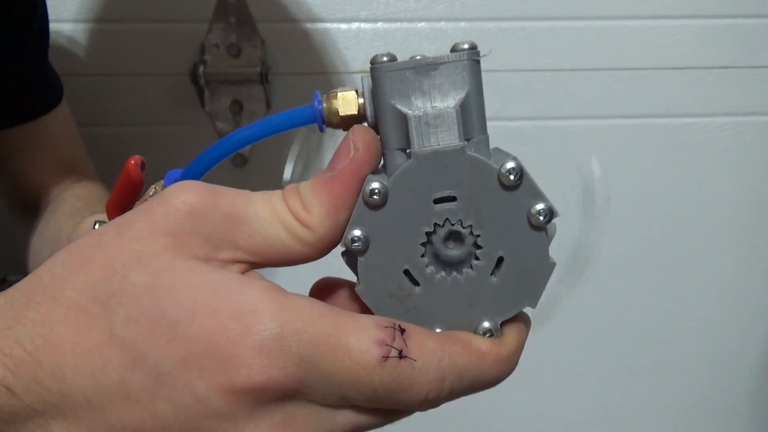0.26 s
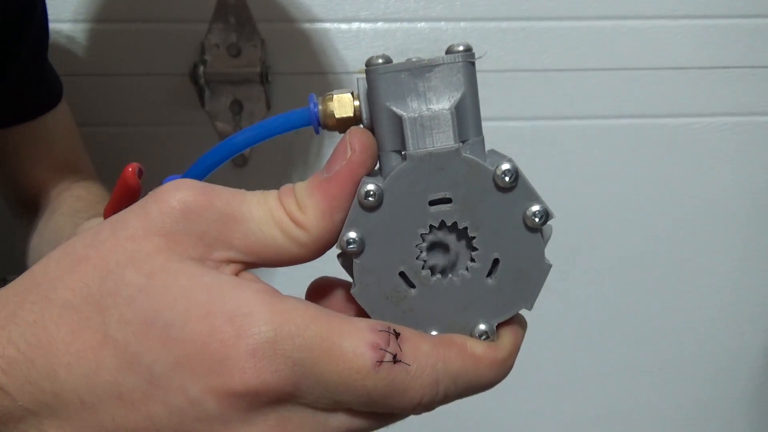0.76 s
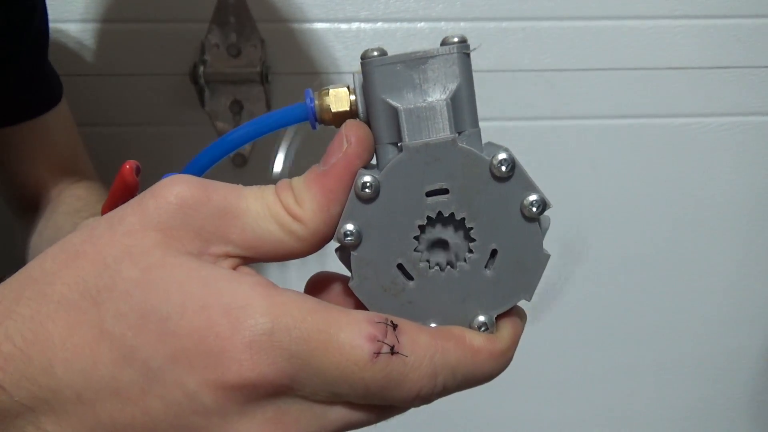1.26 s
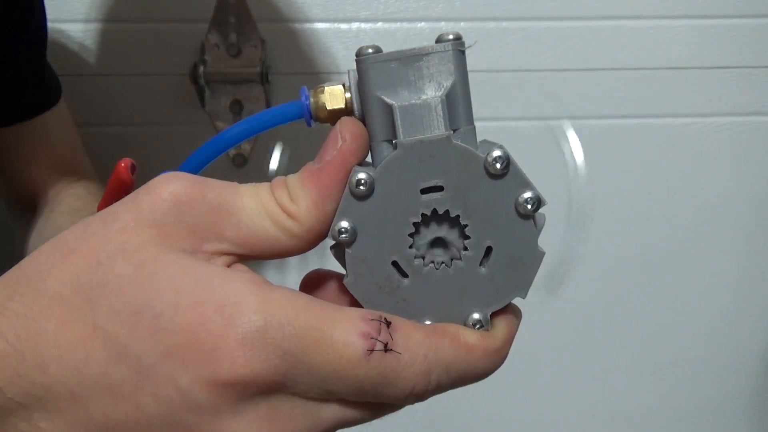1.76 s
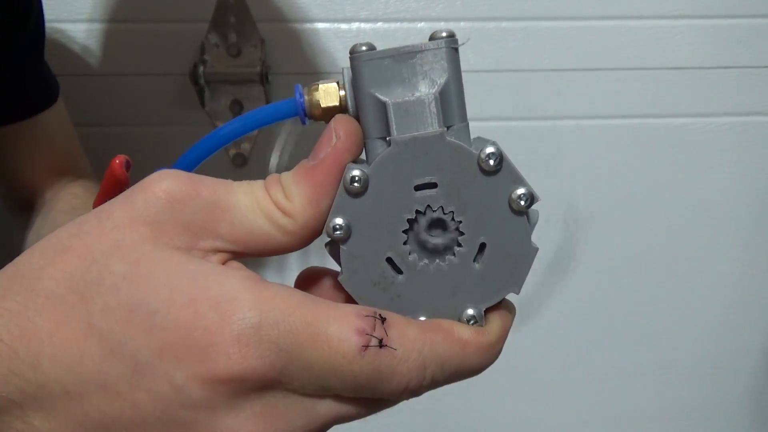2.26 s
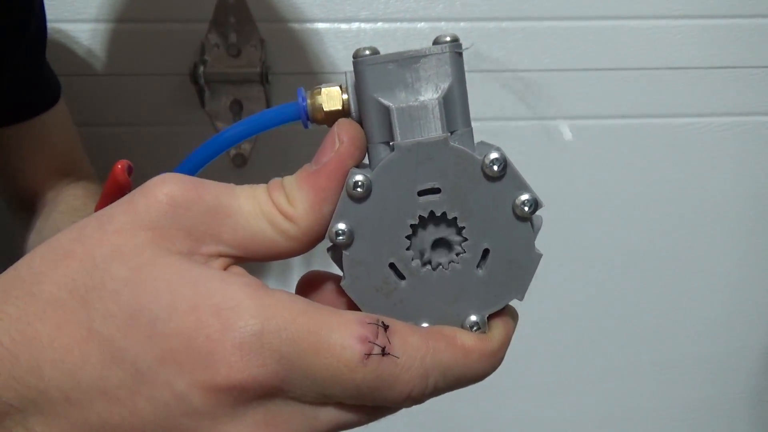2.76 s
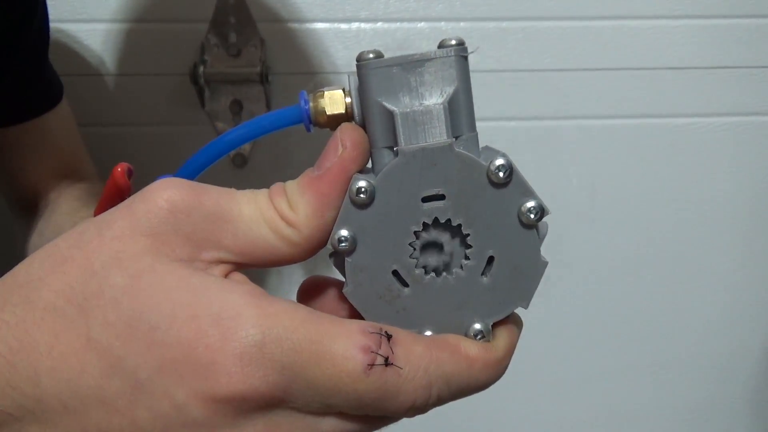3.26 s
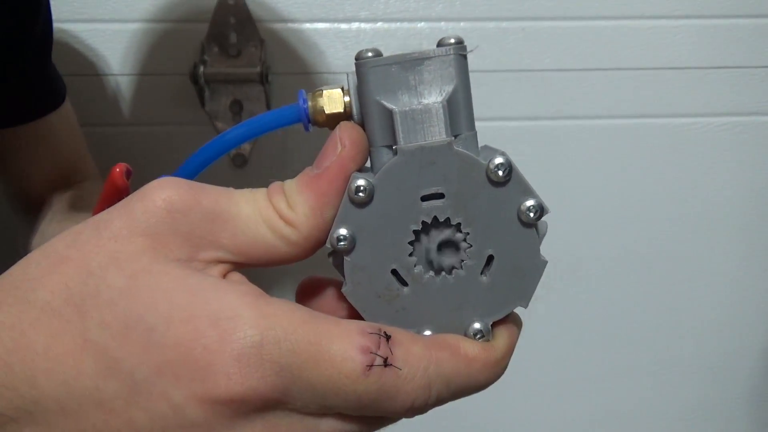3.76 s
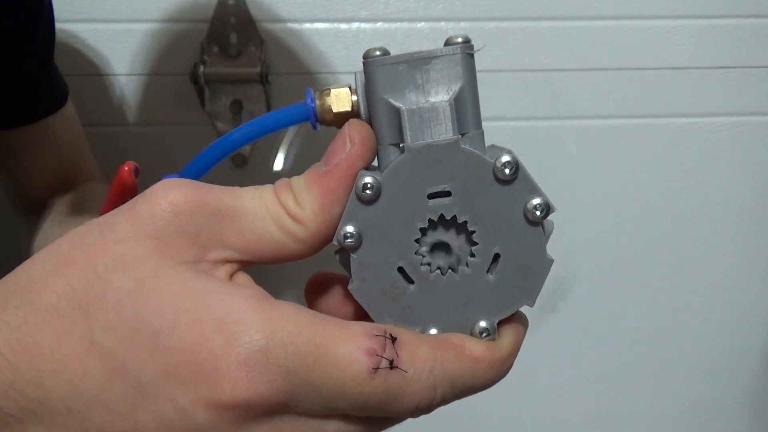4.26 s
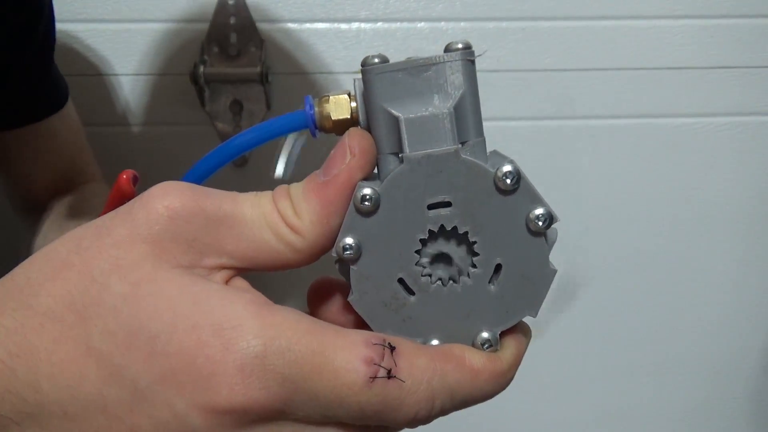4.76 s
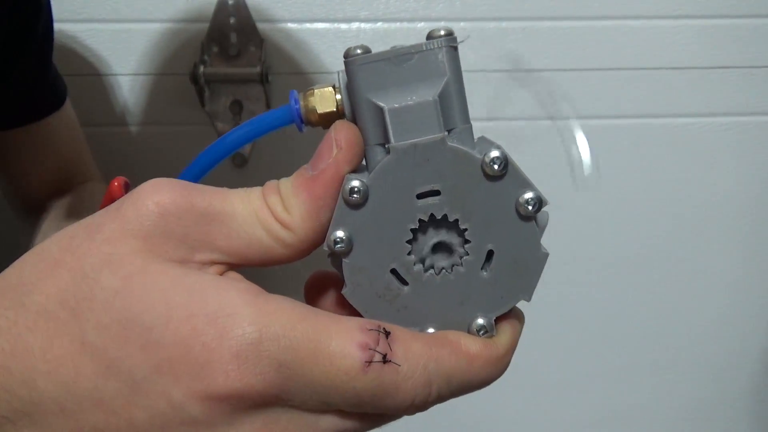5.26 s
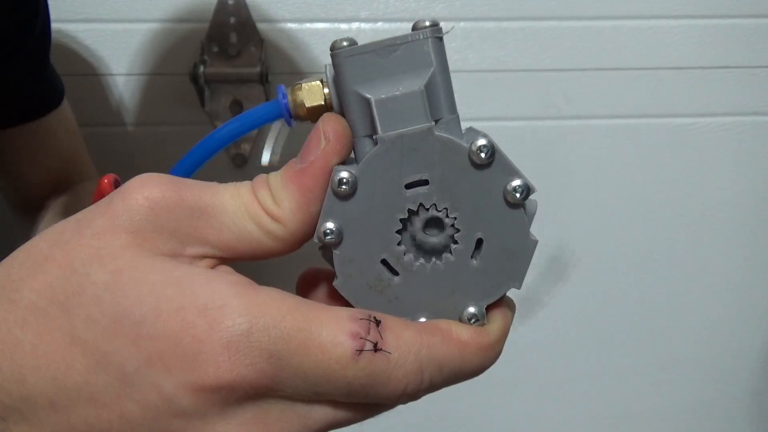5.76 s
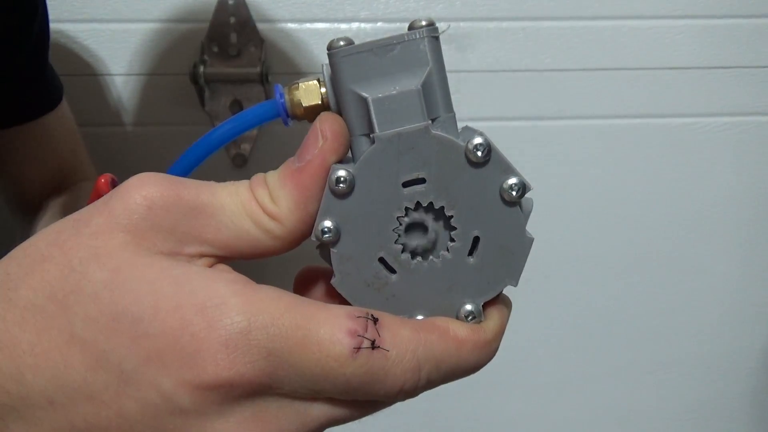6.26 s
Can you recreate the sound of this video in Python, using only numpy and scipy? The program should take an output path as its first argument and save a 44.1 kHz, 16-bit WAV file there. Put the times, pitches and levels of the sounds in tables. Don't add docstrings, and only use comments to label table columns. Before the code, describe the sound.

Very close to a stereo microphone pair in a garage, a small hand-held plastic engine runs on compressed air. Crisp jets of hiss, each edged by a small pop at opening and closing, repeat about nine times a second. Between them air leaks and swells. Every second jet brings a short gritty squeak; rotor tips knock, gears tick and ridges crackle. It speeds up slightly, then slows unevenly to about seven jets a second.

```python
import sys
import numpy as np
from scipy import signal
from scipy.fft import rfft, irfft, next_fast_len
from scipy.io import wavfile
from scipy.ndimage import uniform_filter1d, map_coordinates

SR = 44100
rng = np.random.default_rng(int(sys.argv[2]) if len(sys.argv) > 2 else 0)


def output_pcm(signal):
    pcm = np.clip(np.atleast_2d(signal).T, -1, 1) * 32767
    wavfile.write(sys.argv[1], SR, np.round(pcm).astype(np.int16))


def field_ratio(decibels):
    return 10 ** (np.asarray(decibels, dtype=float) / 20)


N = 287532
T = np.arange(N) / SR

# (time [s], speed [turns/s])
SHAFT_SPEED = [
    (0, 4.422),
    (.86, 4.849),
    (1.73, 4.888),
    (2.37, 4.384),
    (2.89, 4.212),
    (3.79, 4.628),
    (4.33, 4.131),
    (4.81, 3.894),
    (5.88, 3.611),
    (6.6, 3.836),
]
OPENS_TURN = [.063, .549]
SHUTS_TURN = [.289, .773]
# (time [s], pressure build-up behind the shut port [dB])
SEAL_LIFT = [(0, -27), (.45, -31.5), (.95, -29), (1.5, -31.5), (1.8, -23), (2.0, -25), (2.22, -18),
             (2.34, -27.5), (2.58, -22), (2.9, -27.5), (3.2, -36.5), (3.6, -34.5), (3.75, -26.5),
             (4.05, -22), (4.9, -24), (5.05, -28.5), (5.45, -26), (6.5, -29)]
# (first stroke [dB], second [dB])
JET_DB = [-17, -17]
FRESH_DB = [0.02, 0.86]
SPENT_DB = [0.2, -0.5]
BUILD_DB = [0.24, -0.4]
POP_OPEN_DB = [-21, -21.5]
POP_SHUT_DB = [-23.5, -23]
# (frequency [Hz], fresh jet [dB], spent jet [dB], leak [dB], build-up [dB])
AIR_COLOURS = [(464, -20.5, -27, -28.5, -20), (1040, -20.5, -21.5, -17.5, -19.5),
               (1916, -10.5, -12, -5, -14), (3520, -7.5, -6, 0, -5.5), (4700, -1.5, -8, -2, -7.5),
               (4850, -7, -8, -7.5, -3.5), (6590, 1.5, -5, -1, 4.5), (7370, -2, -12.5, -12, 1),
               (8130, 2.5, -6, -9.5, 6.5), (10190, -6.5, 1, 0, 6), (11120, -8.5, -7, -3, -7),
               (12300, -10, -10, -5.5, -9), (15100, -9, -17, -26, -2), (15800, -19, -24.5, -14, -6)]
# (frequency [Hz], width [Hz], level [dB])
RIDGE_MODES = [(1750, 1000, -5.5), (2750, 450, 5.5), (4400, 870, -9)]
# (frequency [Hz], width [Hz], level [dB])
SLOT_MODES = [(2670, 150, 0), (2900, 240, -7)]
# (shaft angle [turns], level [dB])
WHISTLE_SWELL = [(0, -34), (.06, -32), (.1, -26.5), (.13, -28), (.17, -38), (.46, -40), (.51, -32.5),
                 (.536, -29), (.565, -35), (.62, -41), (.88, -40), (1, -34)]
# (turn [count], level [dB], pitch [Hz])
SQUEAKS = [(0, -34, 614), (2, -33, 630), (3, -34.5, 654), (4, -34, 683), (5, -33, 600), (6, -32.5, 607),
           (7, -32, 658), (8, -35, 587), (9, -32.5, 617), (11, -33.5, 576), (12, -36, 613), (13, -32, 668),
           (14, -33.5, 623), (15, -34, 606), (16, -35, 580), (17, -33, 606), (18, -35, 633),
           (19, -35.5, 550), (20, -34, 625), (21, -36, 577), (22, -36, 620), (23, -34.5, 626),
           (24, -33, 620), (25, -33, 609), (26, -33.5, 637), (27, -33, 632)]
# (frequency [Hz], width [Hz], level [dB])
HOUSING_MODES = [(575, 310, 0), (865, 280, 2.5), (1520, 500, -25), (2660, 250, 1)]
# (shaft angle [turns], level [dB], ring [Hz], width [Hz])
KNOCKS = [
    (.228, 1, 2000, 700),
    (.24, -8.5, 750, 500),
    (0.359, -14, 1010, 500),
    (.68, -8, 550, 400),
]
# (time [s], level [dB], left-right [dB])
GUSTS = [(.29, -49, -1), (.915, -38, 7), (1.122, -37, 5), (1.325, -52, -18), (1.74, -41, 0),
         (2.164, -88, -5), (2.196, -29, 1), (2.612, -33.5, 1), (2.891, -41.5, 3), (3.77, -50, -4),
         (3.972, -36, 1), (4.499, -36, 1), (4.738, -34.5, 2), (4.953, -44, -1), (5.213, -39, 3)]
# (frequency [Hz], level [dB])
BUFFET_COLOUR = [(25, -27), (60, -9), (140, -3), (300, 2.5), (600, -24), (1200, -20)]
# (frequency [Hz], level [dB])
SWIRL_COLOUR = [(25, -44), (70, -30), (140, -10), (300, -6.5), (600, -7), (1200, -25)]
# (share of the pause [0-1], level [dB], slot ring re level [dB])
BACKLASH = [
    (.5, -31.5, -17),
    (.74, -24, -11),
]
# (time [s], level [dB], slot ring re level [dB])
TICKS = [(0.1121, -15.5, -11), (0.3335, -20, -6), (0.4268, -19, -12), (0.5323, -21, -17),
         (0.7453, -17, -21), (.952, -18.5, -14), (1.0725, -19, -17), (1.27, -24, -35), (1.3778, -20, -29),
         (1.4645, -23, -7), (1.568, -20.5, -22), (1.787, -19, -15), (1.868, -18, -18), (2.083, -22.5, -20),
         (2.417, -22, -4), (2.9094, -18, -7), (3.0002, -21, -17), (3.357, -15.5, -20), (3.371, -26, -3),
         (3.5765, -17.5, -22), (3.8115, -20, -5), (4.2435, -22, -8), (4.358, -20.5, -19),
         (4.7342, -19, -9.5), (4.993, -23, -7), (5.022, -28, -4), (5.401, -20, -15), (5.6345, -22, -5),
         (6.2028, -22, -5), (6.3666, -22, -9)]
# (frequency [Hz], level [dB])
CLACK_COLOUR = [(1200, -12), (2000, -6.5), (3800, 7), (5200, -3.5), (8000, -2.5), (11000, -11),
                (15500, -3.5)]
# (frequency [Hz], level [dB])
HUM_COLOUR = [(25, -25), (60, -17), (150, 1.5), (400, 1.5), (1000, -1), (3000, -15.5)]
# (frequency [Hz], level [dB])
SCATTER_COLOUR = [(200, -27), (600, -29), (1500, -16), (3200, -35), (5000, -25), (6500, -16.5), (9500, -23),
                  (11500, -19.5), (14000, -41)]
# (frequency [Hz], t60 [s])
GARAGE_T60 = [(200, 0.62), (2000, 0.9), (10000, 0.54)]
# (frequency [Hz], left-right [dB])
PAIR_LEAN = [(60, 0.0), (92, -4), (140, 3), (210, 2.5), (330, -1.5), (500, 0), (770, 1), (1170, -2.5),
             (1790, 2), (2740, 1), (4190, -0.5), (6410, 0), (9810, -2.5), (15000, 2)]
# (frequency [Hz], level [dB])
CAPSULE_COLOUR = [(8200, 0), (8700, -2), (9300, 0), (14700, 0), (15200, 4)]


def unit(x):
    return x / np.sqrt(np.mean(x ** 2) + 1e-20)


def along(points, hz):
    f, v = np.transpose(points)
    return np.interp(np.log(hz + 1), np.log(f + 1), v)


def filtered(x, response):
    m = next_fast_len(N + 8192)
    return irfft(rfft(x, m) * response(np.fft.rfftfreq(m, 1 / SR)), m)[..., :N]


def hiss(points, channels=1):
    noise = rng.standard_normal((channels, N))
    return unit(filtered(noise, lambda hz: field_ratio(along([(10, -90), *points], hz))))


def resonant(x, modes):
    def response(f):
        total = 0
        for k, (centre, width, db) in enumerate(modes):
            damping = 1j * f * width
            total = total + (-1) ** k * field_ratio(db) * damping / (centre * centre - f * f + damping)
        return total
    return filtered(x, response)


def wobble(rate):
    return map_coordinates(rng.standard_normal(int(N * rate / SR) + 4), [T * rate])


def staged(times, levels_db):
    return field_ratio(np.interp(T, np.sort(np.transpose(times).ravel()), np.transpose(levels_db).ravel()))


def add(track, s, sound):
    part = track[..., max(round(s * SR), 0):][..., :sound.shape[-1]]
    part += sound[..., :part.shape[-1]]


def patchy(x, depth_db):
    z = signal.stft(x, nperseg=256)[2]
    field = uniform_filter1d(rng.standard_normal(z.shape), size=3, axis=0)
    field = uniform_filter1d(field, size=8, axis=1)
    return unit(signal.istft(z * field_ratio(depth_db * unit(field)), nperseg=256)[1][:N])


def shaft():
    t = np.arange(N + SR // 10) / SR
    return t, np.cumsum(np.interp(t, *np.transpose(SHAFT_SPEED))) / SR


def strokes():
    leak_db, leak_follows = -32, 0.41
    t, angle = shaft()
    turns = np.arange(int(angle[-1]) + 1)[:, None]
    opens, shuts = [(turns + port).ravel() for port in (OPENS_TURN, SHUTS_TURN)]
    done = shuts < angle[-1]
    opens, shuts = np.interp(opens[done], angle, t), np.interp(shuts[done], angle, t)
    build = np.interp(opens, *np.transpose(SEAL_LIFT))
    leak = leak_db + leak_follows * (build - build.mean())
    build = build + np.resize(BUILD_DB, len(opens))
    return opens, shuts, np.resize(JET_DB, len(opens)), leak, build


def room_floor():
    level = field_ratio(-56.0) * field_ratio(4.1 * wobble(25))
    return level * (hiss(HUM_COLOUR) + 0.32 * hiss(SWIRL_COLOUR, channels=2))


def air():
    opens, shuts, jet, leak, build = strokes()
    uneven = [[.4], [.8], [.9]] * rng.standard_normal((len(jet), 3)).T
    jet, leak, build = np.array([jet, leak, build]) + uneven
    before = np.r_[opens[0] - .05, shuts[:-1]]
    gap, span, off = opens - before, shuts - opens, jet - 45
    hz, *colours = np.transpose(AIR_COLOURS)
    fresh, spent, seal, rising = [patchy(hiss([(250, -40), *zip(hz, c)])[0], depth_db=1.2) for c in colours]
    knots = [opens - .0015, opens + 0.00091, opens + 0.576 * span, opens + 0.567 * span,
             shuts - .001, shuts + 0.0022, shuts + 0.0049]
    new, old = jet + np.resize(FRESH_DB, len(jet)), jet + np.resize(SPENT_DB, len(jet))
    out = fresh * staged(knots, [off, new - 1.1, new - .4, new - 5, new - 8, new - 22, off])
    out += spent * staged(knots, [off, old - 13, old - 8, old - 1.5, old - .6, old - 11, off])
    knots = [before + .001, before + 0.34 * gap, before + 0.63 * gap, opens - .009, opens, opens + 0.022]
    flutter = field_ratio(1.4 * wobble(60) + 2.4 * wobble(260))
    out += seal * staged(knots, [leak + 2.0, leak + 0.7, leak - 1.5, leak - 4, leak - 5, leak - 7]) * flutter
    swell = [leak - 14, (leak + build) / 2 - 8, build - 4, build - .6, build + 3.5, off]
    out += rising * staged(knots, swell)
    return out * field_ratio(.4 * wobble(40) + 1.1 * wobble(700))


def crackle():
    opens, shuts, jet, leak, _ = strokes()
    load = staged([opens - .003, opens, shuts, shuts + .003], [leak + 11, jet + 1.9, jet + 1.3, leak + 11])
    hits = (rng.random(N) < 260 / SR) * rng.choice([-1, 1], N)
    ridges = hits * field_ratio(5.2 * np.minimum(rng.exponential(size=N), 3.2))
    return resonant(load * ridges, RIDGE_MODES)


def whistle():
    level_db = np.interp(shaft()[1][:N] % 1, *np.transpose(WHISTLE_SWELL))
    level_db = level_db + .3 * (T - 5.5)
    swell = field_ratio(level_db + 1.5 * wobble(8.1))
    eddies = rng.standard_normal(N) * field_ratio(3.5 * wobble(200))
    return swell * patchy(resonant(eddies, SLOT_MODES), depth_db=1.5)


def squeaks():
    lead_s, usual_s, s_per_db = .002, 0.028, .0025
    slips, starts = np.zeros(N), strokes()[0][::2] - lead_s
    drift, grip, grit = wobble(210), wobble(240), rng.standard_normal(N)
    for turn, db, hz in SQUEAKS:
        s, length = starts[round(turn)], max(usual_s - s_per_db * (db + 36), .012)
        t = np.arange(int(length * 1.2 * SR)) / SR
        u, i = t / t[-1], round(s * SR) + np.arange(len(t))
        bite = np.exp(-((t - .0085) / .0025) ** 2)
        pitch = hz * (1.0 + .14 * bite - .55 * u + .55 * u * u + 0.04 * drift[i])
        phase = np.cumsum(pitch) / SR % 1
        saw = 1 - 2 * phase + 2.65 * grit[i] * np.exp(-3 * phase)
        level = field_ratio(db + 3.5 + 3.7 * bite + 4.4 * grip[i])
        add(slips, s, level * np.minimum(1, t / 0.00086) * np.sqrt(1 - u ** 3) * saw)
    return resonant(slips, HOUSING_MODES)


def pops():
    out, t = np.zeros(N), np.arange(400) / SR - .0005
    push = np.exp(-(t / 0.000092) ** 2) - 0.29 * np.exp(-((t - .0005) / 0.00039) ** 2)
    push[122:] += 0.18 * push[:-122]
    ports = np.transpose(strokes()[:2])
    levels = np.resize(np.transpose([POP_OPEN_DB, POP_SHUT_DB]), ports.shape)
    levels = levels + rng.normal(0, 1.23, ports.shape)
    for (opens, shuts), (open_db, shut_db) in zip(ports, levels):
        add(out, opens - .0005, field_ratio(open_db) * push)
        add(out, shuts - .0005, field_ratio(shut_db) * push)
    return out


def knocks():
    spread_db = 5
    t, angle = shaft()
    out, turns, u = np.zeros(N), np.arange(int(angle[N])), np.arange(300) / SR
    for place, db, hz, width in KNOCKS:
        ring = 2 * np.pi * width / SR * np.exp(-np.pi * width * u) * np.cos(2 * np.pi * hz * u)
        for turn, (late, size) in zip(turns, rng.standard_normal((len(turns), 2))):
            s = np.interp(turn + place + 0.00596 * late, angle, t)
            add(out, s, field_ratio(db + spread_db * size) * ring)
    return out


def puffs():
    puff_db, spread_db, puff_s, lag_s, gust_s = -45.5, 1.5, 0.033, -0.0024, 0.017
    out, shuts = np.zeros((2, N)), strokes()[1][:-1:2]
    lumps = 0.7 * hiss(BUFFET_COLOUR) + 0.7 * hiss(SWIRL_COLOUR, channels=2)
    lumps = np.pad(field_ratio(5.8 * wobble(120)) * lumps, [(0, 0), (0, SR // 10)], "reflect")
    chance = rng.standard_normal((len(shuts), 2))
    steady = [(s + lag_s, puff_db + spread_db * a, 1 + 1.5 * b, puff_s) for s, (a, b) in zip(shuts, chance)]
    for s, db, pan_db, length in steady + [(*row, gust_s) for row in GUSTS]:
        t, start = np.arange(-1.5 * length, 1.1 * length, 1 / SR), max(s - 1.35 * length, 0)
        puff = np.exp(-(t / (.5 * length)) ** 2) * lumps[:, round(start * SR):][:, :len(t)]
        add(out, start, field_ratio(db - 6) * unit(puff) * field_ratio([[pan_db / 2], [-pan_db / 2]]))
    return out


def backlash():
    spread_db = 1.5
    opens, shuts, *_ = strokes()
    chance = rng.standard_normal((len(opens) - 1, len(BACKLASH), 2))
    rows = []
    for a, b, pause in zip(shuts, opens[1:], chance):
        for (share, db, slot_db), (late, size) in zip(BACKLASH, pause):
            rows.append((a + (share + .03 * late) * (b - a), db + spread_db * size, slot_db))
    return rows


def ticks():
    spit, ring, click, t = np.zeros(N), np.zeros(N), np.zeros(N), np.arange(600) / SR
    for s, db, slot_db in TICKS + backlash():
        t60 = max(0.013 + 0.001 * (db + 19.5), .003)
        shape = field_ratio(db + 2.5 - 60 * t / t60) * (1 - np.exp(-t / 0.00016))
        add(spit, s, shape * np.sqrt(max(1 - 1.5 * field_ratio(slot_db) ** 2, .05)))
        add(ring, s, shape * field_ratio(slot_db + 7.5))
        click[round(s * SR) + 12] = field_ratio(db + 12.5)
    edge = filtered(click, lambda hz: field_ratio(along(CLACK_COLOUR, hz)))
    slot = unit(resonant(rng.standard_normal(N), SLOT_MODES))
    return edge + spit * hiss(CLACK_COLOUR)[0] + ring * slot


def nearby(x):
    t = np.arange(SR // 8) / SR
    smear = rng.standard_normal(SR // 8) * field_ratio(-60 * t / 0.044)
    odd = signal.fftconvolve(x, smear / np.linalg.norm(smear))[:N]
    return filtered(odd, lambda hz: field_ratio(along(SCATTER_COLOUR, hz))) * [[1], [-1]]


def garage(x):
    hz, t, z = signal.stft(rng.standard_normal((2, SR // 2)), SR, nperseg=256)
    decay = field_ratio(-60 * t / along(GARAGE_T60, hz)[:, None])
    tail = signal.istft(z * decay, SR, nperseg=256)[1]
    late = np.pad(x, (300, 0))[None]
    return signal.fftconvolve(late, tail / np.linalg.norm(tail[0]), axes=1)[:, :N]


def scene():
    engine = air() + crackle() + whistle() + squeaks() + pops() + knocks() + ticks()
    sides = np.array([[.5], [-.5]])
    direct = filtered(engine, lambda hz: field_ratio(sides * along(PAIR_LEAN, hz)))
    return direct + nearby(engine) + field_ratio(-29.0) * garage(engine) + puffs() + room_floor()


def roll_off(x):
    return signal.sosfilt(signal.butter(12, 16630, fs=SR, output="sos"), x)


def record(dry):
    rounded = dry / (1 + np.abs(dry / .66) ** 4) ** (1 / 4)

    def microphone(hz):
        low_cut = 1j * hz / (45 + 1j * hz)
        return (hz < 15740) * field_ratio(along(CAPSULE_COLOUR, hz)) * low_cut
    return roll_off(filtered(rounded, microphone))


dry = scene()
out = record(dry)
output_pcm(out)
```